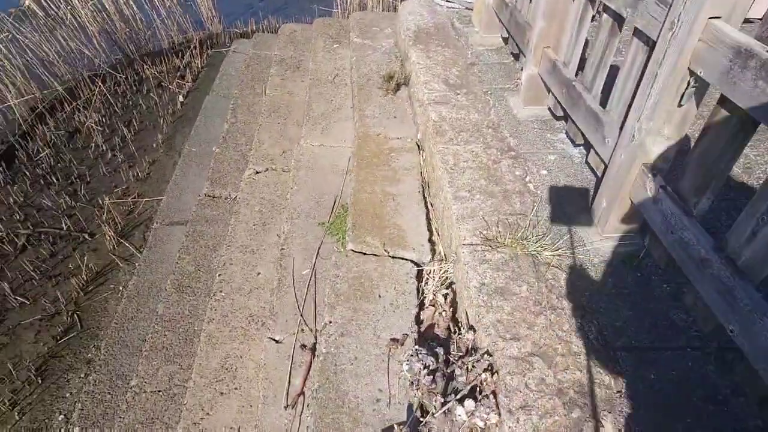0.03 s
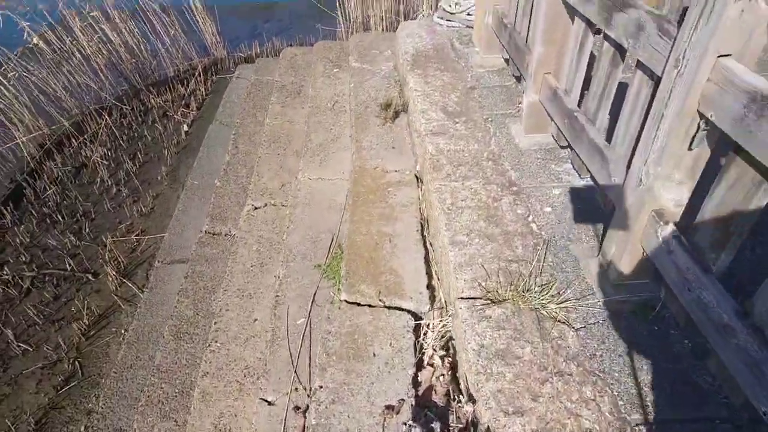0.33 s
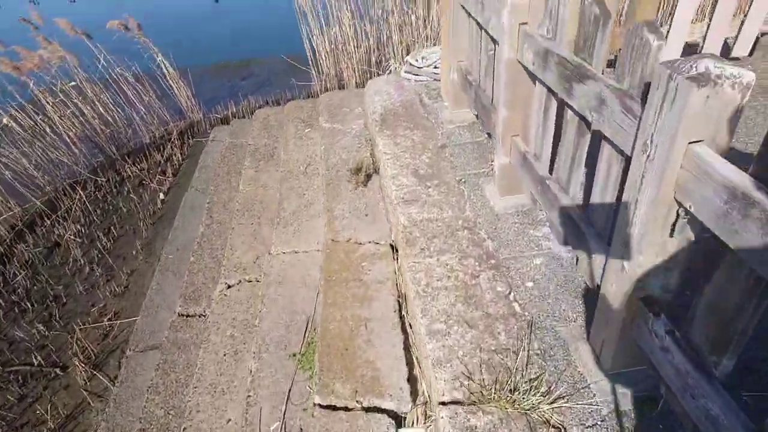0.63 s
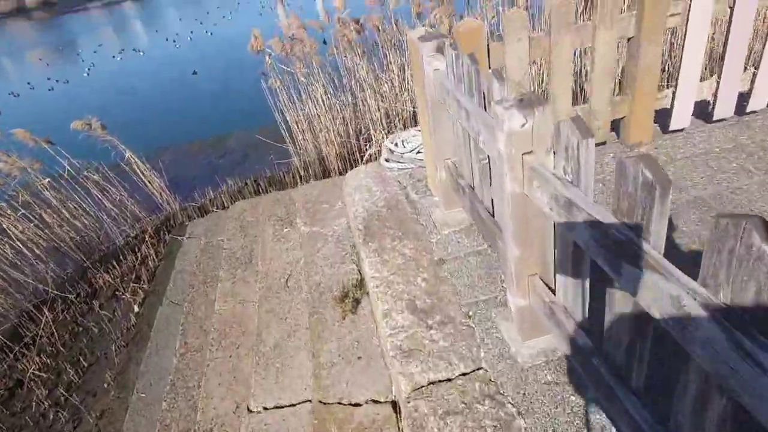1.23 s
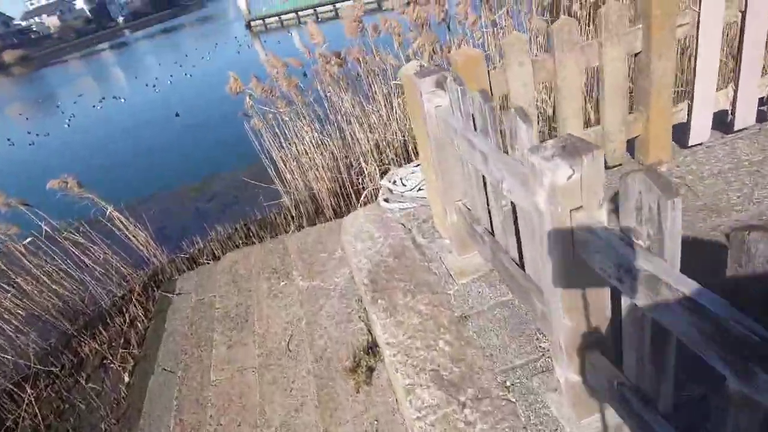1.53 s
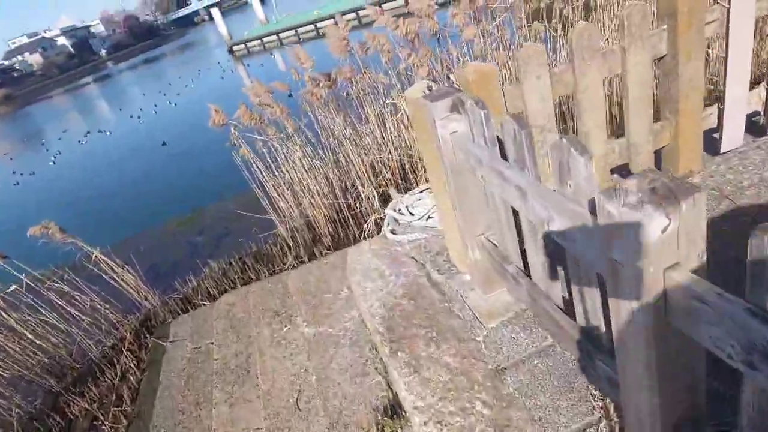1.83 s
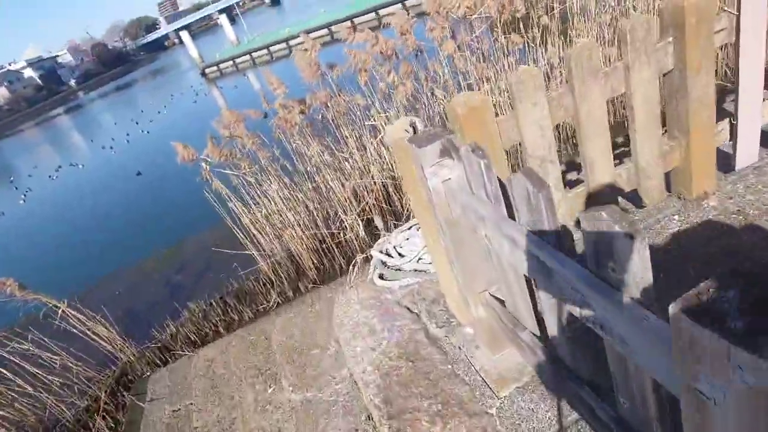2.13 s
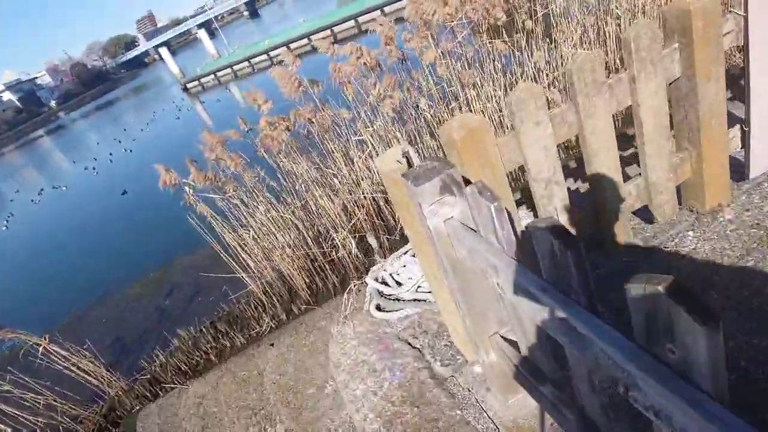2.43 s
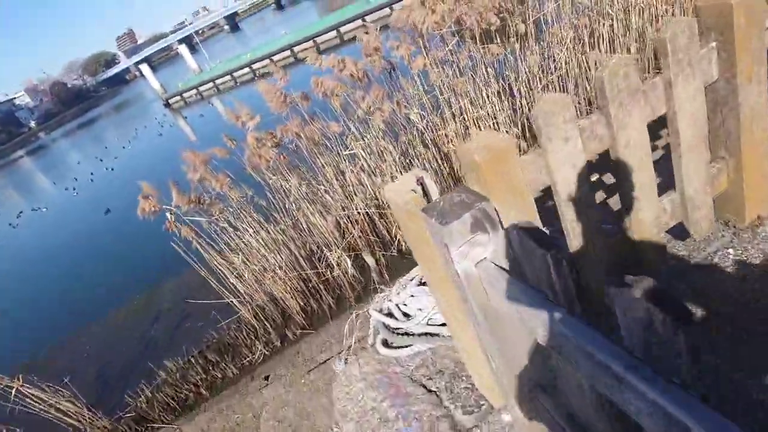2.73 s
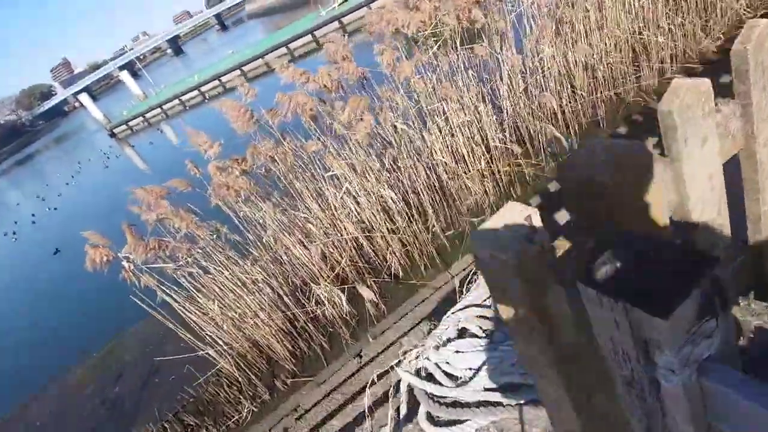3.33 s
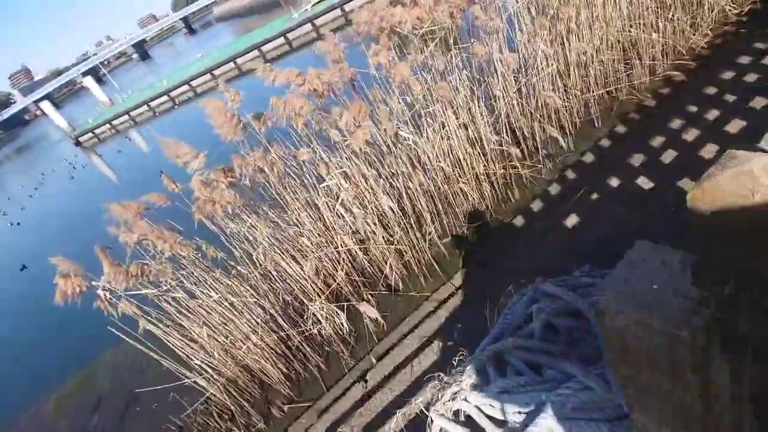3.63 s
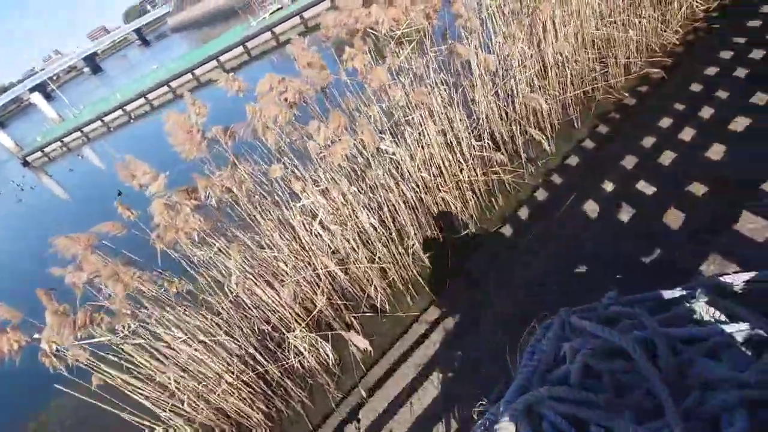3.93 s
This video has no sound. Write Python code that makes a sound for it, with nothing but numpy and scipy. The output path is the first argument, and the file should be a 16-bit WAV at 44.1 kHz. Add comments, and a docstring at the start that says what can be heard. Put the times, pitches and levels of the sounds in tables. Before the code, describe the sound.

Wind rustles dry reeds over low microphone rumble and a faint distant town hum.

```python
"""Dry reeds hiss in swells, mostly from the right, over a far town hum and a low wind rumble.
The hiss comes from countless leaves rubbing and ticking together on a riverbank.
Eddies (small swirls of wind) buffet the microphone's two openings, or ports, the right one hardest.
They make the rumble, short flurries and, where one hits squarely, a single soft thump."""
import sys
import numpy as np
from scipy import signal
from scipy.fft import rfft, irfft
from scipy.io import wavfile
from scipy.ndimage import uniform_filter1d

SR = 44100
rng = np.random.default_rng(int(sys.argv[2]) if len(sys.argv) > 2 else 0)


def unload_audio(sound):
    """Save the sound as a 16-bit wav file, at the path given as the first command line argument."""
    columns = np.transpose(np.atleast_2d(sound))
    # keep every value between -1 and 1, then stretch to whole-number steps
    steps = np.round(np.clip(columns, -1, 1) * 32767)
    wavfile.write(sys.argv[1], SR, steps.astype(np.int16))


N = 176400
T = np.arange(N) / SR
HZ = np.maximum(np.arange(N // 2 + 1) * SR / N, 1)
CUTOFF_HZ = 15550

# Levels in these tables are relative: the functions set the final loudness.
# How the reeds' hiss swells and fades: time_s, level_db
REED_SWELLS = [(0.0, -50.5), (0.26, -39.5), (0.39, -42.5), (0.41, -40), (0.46, -44), (0.61, -38.5),
               (0.65, -44), (0.82, -52.5), (0.88, -49.5), (1.1, -49), (1.14, -44.5), (1.16, -48),
               (1.38, -47), (1.4, -51), (1.47, -47), (1.63, -48.5), (1.65, -51), (1.73, -46), (1.78, -54),
               (1.92, -51), (1.96, -54), (2.09, -48.5), (2.19, -51.5), (2.45, -38), (2.66, -47.5),
               (2.7, -42.5), (2.83, -39.5), (2.9, -44), (2.96, -41.5), (3.05, -49.5), (3.13, -52.5),
               (3.2, -50), (3.27, -61.5), (3.32, -54), (3.34, -57.5), (3.66, -53), (3.87, -58.5),
               (4.0, -53.5)]
# Tone of the hiss at the right port: frequency_hz, level_db
HISS_TONE_RIGHT = [(300, -21), (700, -12), (1100, -7.5), (1700, -5.5), (2500, -3.5), (4000, -2), (5400, -1),
                   (6700, -4.5), (7500, 0.5), (9000, -3.5), (12000, -5), (15500, -6)]
# Tone of the hiss at the left port, with deep dips: frequency_hz, level_db
HISS_TONE_LEFT = [(300, -23), (700, -12), (1200, -9.5), (1800, -7), (2300, -17.5), (2800, -16.5),
                  (3400, -8), (4000, -5), (5250, -8), (5800, -22), (6250, -21), (6700, -15), (7400, -9.5),
                  (9000, -14), (12000, -18), (15000, -26)]
# How alike the hiss is at the two ports: frequency_hz, likeness_0_to_1
HISS_ALIKE = [(500, 0.1), (1200, 0.65), (2800, 0.3), (4500, 0.4), (5800, 0.3), (7600, 0.36), (12000, 0)]
# Tone of the far town: frequency_hz, level_db
TOWN_TONE = [(40, 4), (150, 2.5), (280, -2), (480, -2.5), (620, 1.5), (800, -2.5), (1000, -7),
             (1300, -11.5), (1750, -10), (2400, -17), (6000, -34), (15000, -38)]
# Wind pressure on the right port: time_s, level_db
WIND_RIGHT = [(0.0, -28), (0.26, -35.5), (0.3, -29), (0.4, -34), (0.43, -26.5), (0.53, -23), (0.57, -35.5),
              (0.7, -40), (0.79, -25.5), (0.81, -32), (0.85, -23.5), (0.88, -39.5), (0.92, -24.5),
              (1.02, -40.5), (1.05, -33), (1.26, -32.5), (1.29, -31), (1.35, -31.5), (1.39, -25.5),
              (1.49, -40.5), (1.68, -26), (1.75, -38.5), (1.88, -28.5), (1.99, -51), (2.05, -30.5),
              (2.17, -29), (2.19, -25), (2.36, -32.5), (2.38, -41), (2.43, -32), (2.54, -28), (2.57, -27),
              (2.66, -37.5), (2.73, -30), (2.77, -36.5), (2.96, -26.5), (2.99, -33.5), (3.05, -27),
              (3.1, -39.5), (3.9, -44), (3.97, -35.5), (4.0, -27)]
# Wind pressure on the sheltered left port: time_s, level_db
WIND_LEFT = [(0, -48.5), (.1, -39), (.3, -48), (.55, -48), (.65, -36), (.9, -48), (1.15, -37.5), (1.6, -44),
             (2.1, -58), (2.7, -41), (3.1, -44), (3.4, -38.5), (3.75, -33.5), (3.92, -37), (4, -25.5)]
# Tone of slowly churning air: frequency_hz, level_db
RUMBLE_TONE = [(10, -8), (25, -1), (50, 0.5), (80, -8.5), (120, -13), (180, -25.5), (300, -35.5),
               (600, -40.5), (1500, -75)]
# Tone of the faster air in an eddy: frequency_hz, level_db
FLURRY_TONE = [(20, 0), (60, 1), (110, 0), (200, -3), (300, -8.5), (450, -19), (600, -30.5), (900, -38.5),
               (1500, -34), (4000, -90)]
# Eddies crossing a port: middle_s, length_s, level_db, port (-1 left, 1 right)
PASSING_EDDIES = [(0.017, 0.028, -22.5, 1), (.07, 0.074, -42, -1), (.09, 0.022, -20.5, 1),
                  (0.136, 0.032, -23.5, 1), (0.18, 0.019, -19.5, 1), (.29, 0.18, -32, 1),
                  (.42, 0.027, -21, 1), (0.484, 0.017, -21, 1), (.527, .025, -28.5, 1),
                  (.65, 0.042, -38.5, -1), (.757, 0.022, -28, 1), (.835, 0.023, -22, 1),
                  (0.929, 0.019, -29.5, 1), (1.079, 0.029, -30.5, 1), (1.12, 0.052, -40, -1),
                  (1.18, 0.11, -35, 1), (1.293, .035, -27, 1), (1.387, 0.015, -21, 1),
                  (1.392, .018, -36, -1), (1.512, 0.032, -28, 1), (1.681, 0.044, -30, 1),
                  (1.777, 0.017, -26, 1), (1.86, 0.046, -36.5, 1), (1.947, 0.015, -25.5, 1),
                  (2.1, 0.13, -34, 1), (2.201, 0.021, -21.5, 1), (2.273, 0.03, -22.5, 1),
                  (2.341, 0.018, -18, 1), (2.42, 0.016, -28, 1), (2.495, 0.044, -24.5, 1),
                  (2.587, 0.05, -20.5, 1), (2.72, 0.04, -39.5, -1), (2.728, 0.0074, -29.5, 1),
                  (2.925, 0.033, -24.5, 1), (3.032, 0.0088, -26, 1), (3.92, 0.052, -28.5, -1),
                  (3.97, 0.023, -26, 1)]
# Eddies hitting the right port squarely: middle_s, level_db, width_s
DIRECT_HITS = [(.083, -19.5, 0.00026), (.42, -9, 0.00078), (.759, -11.5, 0.00088), (.785, -7.5, 0.00056),
               (.836, -8, 0.00044), (1.051, -7.5, 0.00071), (1.304, -14, 0.00048), (1.39, -7.5, 0.00078),
               (2.106, -22, 0.00034), (2.203, -8.5, 0.0006), (2.259, -6.5, 0.00046), (2.287, -9.5, 0.00066),
               (2.49, -11, 0.00054), (2.505, -13.5, 0.00056), (2.573, -14, 0.00046), (2.59, -8.5, 0.00043),
               (2.607, -2, 0.00037), (3.03, -7.5, 0.00062), (3.975, -16, 0.00041)]


def from_db(db):
    """Turn decibels into a number to multiply a sound by."""
    return 10 ** (np.asarray(db) / 20)


def unit_level(x):
    """Scale a signal so that its average strength (rms) is 1."""
    return x / np.sqrt(np.mean(x ** 2) + 1e-20)


def over_time(table):
    """Join a table's points to get a value at every sample."""
    return np.interp(T, *np.transpose(table))


def over_frequency(table):
    """Join a table's points to get a value at every frequency, with octaves evenly spaced."""
    hz, value = np.transpose(table)
    return np.interp(np.log(HZ), np.log(hz), value)


def with_tone(x, tone):
    """Turn each frequency up or down as a tone table says."""
    return irfft(rfft(x) * from_db(over_frequency(tone)), N)


def noise(tone):
    """Steady noise with the given tone and strength 1."""
    return unit_level(with_tone(rng.standard_normal(N), tone))


def dulled(x, above_hz):
    """Smoothly take away the high frequencies."""
    return irfft(rfft(x) / (1 + (HZ / above_hz) ** 4), N)


def wobble(rate_hz, points=4000):
    """A random wavering of strength 1, mostly slower than rate_hz."""
    hz = np.arange(points // 2 + 1) * SR / N
    smooth = irfft(rfft(rng.standard_normal(points)) / (1 + (hz / rate_hz) ** 2), points)
    return np.interp(T, np.linspace(0, T[-1], points), unit_level(smooth))


def steadied(x, span_s):
    """Even out a noise's chance swings, so that a level curve can set its strength."""
    local_power = uniform_filter1d(x ** 2, int(span_s * SR))
    return x / np.sqrt(local_power + 0.11)


def rubbing_leaves(bands=24, flicker_db=1, ticks_per_s=550, ticks_db=-12.5):
    """Rubbing leaves make noise whose bands flicker separately; touching leaves add dry ticks."""
    white_spectrum = rfft(rng.standard_normal(N))
    band_number = np.floor(HZ / CUTOFF_HZ * bands)
    hiss = np.zeros(N)
    for k in range(bands):
        band = irfft(white_spectrum * (band_number == k), N)
        hiss += band * from_db(flicker_db * wobble(rate_hz=36))
    signs = rng.choice([-1, 1], N)
    ticks = signs * (rng.random(N) < ticks_per_s / SR)
    return unit_level(hiss) + from_db(ticks_db) * unit_level(ticks)


def reeds(left_db=-38, right_db=-35.5, left_delay_s=0.000512, flutter_db=1.14):
    """The reeds' hiss swells and flutters; it reaches the left port later and weaker."""
    swell_db = over_time(REED_SWELLS) + 42   # -42 in the table means no boost or cut
    swell_db += flutter_db * wobble(rate_hz=170)
    right = rubbing_leaves()
    # The left port hears a late copy of the right, blended with rubbing of its own.
    alike = over_frequency(HISS_ALIKE)
    late_spectrum = rfft(right) * np.exp(-2j * np.pi * HZ * left_delay_s)
    own_spectrum = rfft(rubbing_leaves())
    left = irfft(alike * late_spectrum + np.sqrt(1 - alike ** 2) * own_spectrum, N)
    left, right = with_tone(left, HISS_TONE_LEFT), with_tone(right, HISS_TONE_RIGHT)
    levels_db = [left_db + 0.95 * swell_db, right_db + swell_db]   # the left swells a little less
    hiss = np.array([left, right]) / right.std() * from_db(levels_db)
    body = dulled(hiss, above_hz=4500)
    treble = hiss - body
    return body + treble * from_db(0.088 * swell_db)   # louder is also brighter


def town_hum(level_db=-52.5):
    """A far town sends a steady hum across the water."""
    return from_db(level_db) * np.array([noise(TOWN_TONE), noise(TOWN_TONE)])


def wind_rumble(left_db=-2, right_db=6):
    """Air churns slowly at each port, rumbling louder as the wind presses harder."""
    levels_db = [left_db + over_time(WIND_LEFT), right_db + over_time(WIND_RIGHT)]
    return np.array([from_db(db) * steadied(noise(RUMBLE_TONE), span_s=0.086) for db in levels_db])


def wind_flurries(dull_below_left_db=-45, dull_below_right_db=-28.5):
    """Each eddy is a short burst of fast-churning air at one port; weak ones are slower and duller."""
    power = np.zeros((2, N))
    for middle_s, length_s, level_db, port in PASSING_EDDIES:
        rise_and_fall = np.exp(-(2 * (T - middle_s) / length_s) ** 2)
        power[int(port > 0)] += from_db(level_db) ** 2 * rise_and_fall
    swirl = np.array([steadied(noise(FLURRY_TONE), span_s=0.0286) for _ in range(2)])
    weak_power = from_db([[dull_below_left_db], [dull_below_right_db]]) ** 2
    brightness = power / (power + weak_power)
    return np.sqrt(power) * (brightness * swirl + (1 - brightness) * dulled(swirl, above_hz=330))


def wind_thumps(top_hz=850, leak_hz=35.2):
    """A direct hit gives the right port one rounded push, with a slow recoil as the port leaks."""
    pushes = np.zeros(N)
    for middle_s, level_db, width_s in DIRECT_HITS:
        widths_away = np.clip((T - middle_s) / width_s, -40, 40)
        pushes += from_db(level_db) / np.cosh(widths_away)
    softened = irfft(rfft(pushes) / np.sqrt(1 + (HZ / top_hz) ** 10), N)
    leak = signal.butter(1, leak_hz, "high", fs=SR, output="sos")
    return np.array([np.zeros(N), signal.sosfilt(leak, softened)])


def scene():
    """Reeds and town, with the wind on the microphone, as left and right channels."""
    return reeds() + town_hum() + wind_rumble() + wind_flurries() + wind_thumps()


def record(dry):
    """Cut off the very highest treble steeply."""
    kept_share = np.clip((CUTOFF_HZ - HZ) / 200 + 0.5, 0, 1)   # falls to nothing across 200 Hz
    return irfft(rfft(dry) * kept_share, N)


dry = scene()
out = record(dry)
unload_audio(out)
```